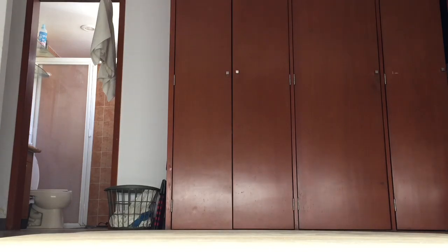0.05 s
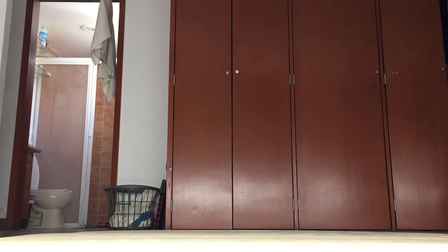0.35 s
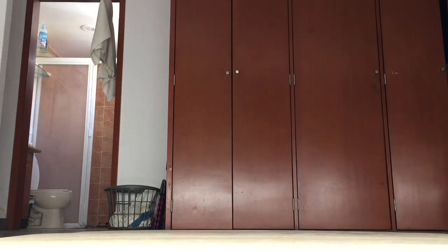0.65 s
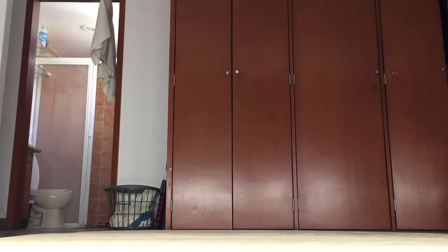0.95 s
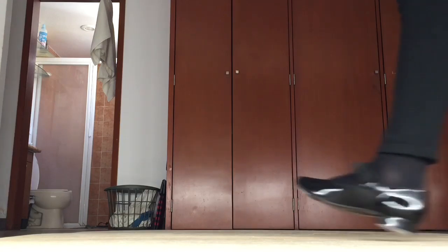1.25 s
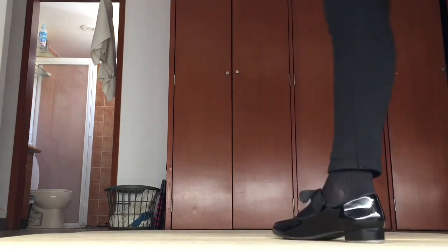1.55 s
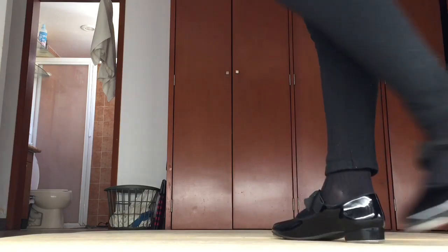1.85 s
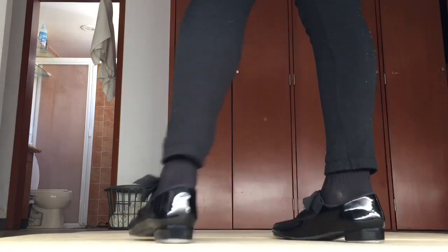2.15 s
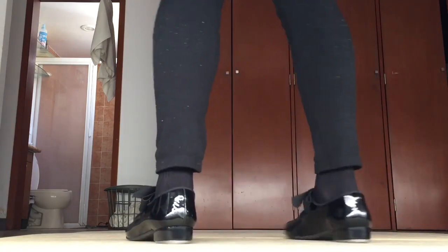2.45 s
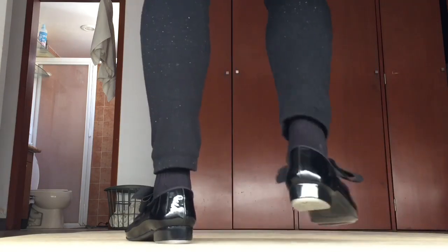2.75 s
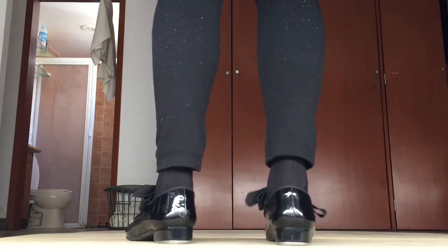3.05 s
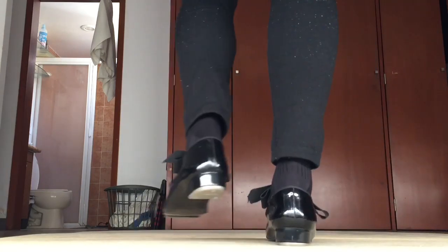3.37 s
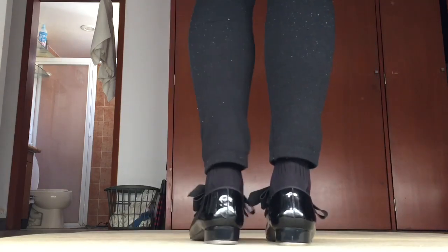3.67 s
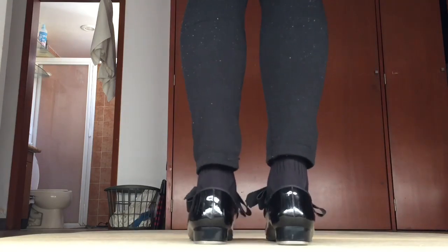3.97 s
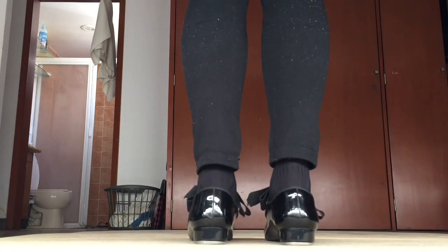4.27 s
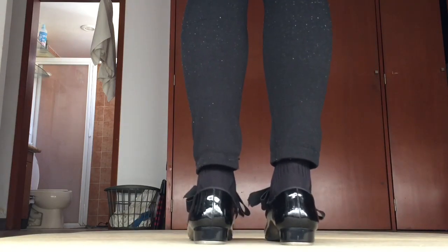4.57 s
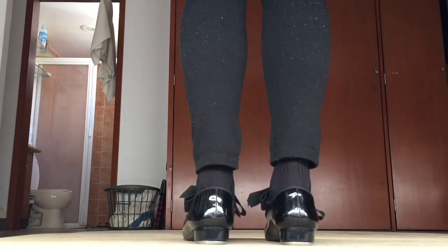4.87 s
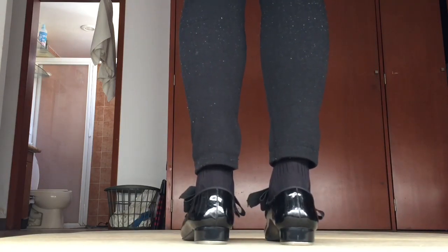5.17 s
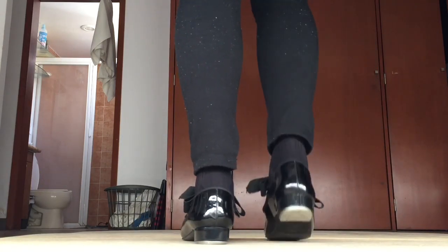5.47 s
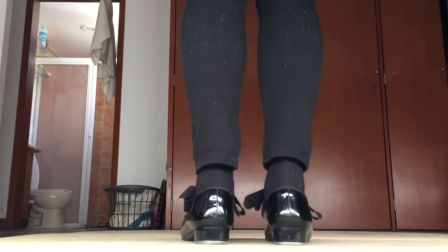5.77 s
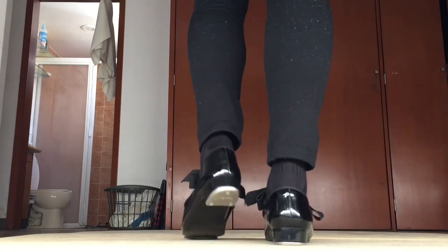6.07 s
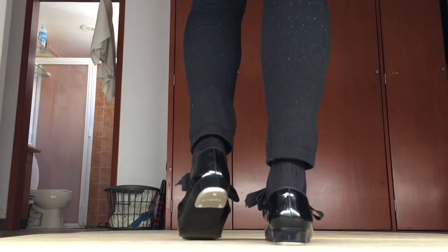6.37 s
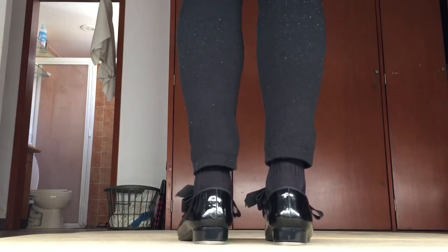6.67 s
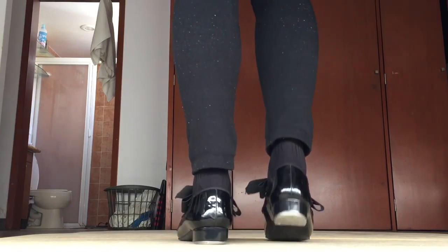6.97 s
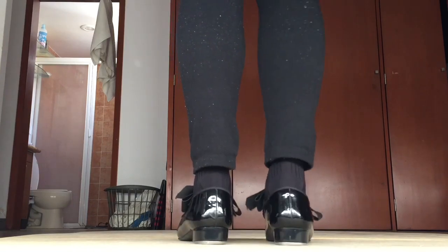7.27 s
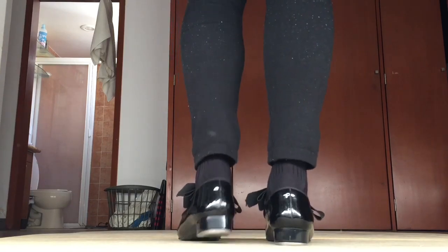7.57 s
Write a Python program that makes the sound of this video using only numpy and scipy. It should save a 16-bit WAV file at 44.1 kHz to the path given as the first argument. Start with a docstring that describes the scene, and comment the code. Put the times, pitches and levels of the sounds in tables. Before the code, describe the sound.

Close heel-and-toe steps in tap shoes, then separate hard stamps with a metallic ring, echoing in a small room over soft hiss.

```python
"""In a small bare room, tap shoes walk in, heel then toe, and stamp on a hard floor near a microphone
lying on it. Each blow thumps the floor, knocks the heel and sole and rings the metal tap: the right
shoe stamps brightly, the left one dully. The room rings on for half a second. Between steps the shoes
tick and shuffle. The air hisses softly, and for a moment a far engine drones faintly."""
import sys
import numpy as np
from scipy import signal
from scipy.fft import rfft, irfft, next_fast_len
from scipy.io import wavfile

SR = 44100
rng = np.random.default_rng(int(sys.argv[2]) if len(sys.argv) > 2 else 0)


def wav_out(sig):
    """Save sig, one row per channel (or a flat mono array), as 16-bit PCM at SR to the path in sys.argv[1]."""
    wavfile.write(sys.argv[1], SR, np.round(np.clip(np.atleast_2d(sig).T, -1, 1) * 32767).astype(np.int16))


N = 340452

# The tone of the room's hiss: pitch_hz, level_db
HISS_SPECTRUM = [(18, -39), (30, -4), (106, -3.5), (153, -14), (215, -5.5), (328, -18.5), (569, -18.5),
                 (1070, -18.5), (1190, -17.5), (1390, -24.5), (16000, -43.5)]
# A foot rolls, lifts or grazes the floor: start_s, strength_db, heel_hz, sharpness_hz
LIGHT_TOUCHES = [(0.048, -44, 577, 1000), (1.796, -61.5, 720, 9000), (2.637, -38.5, 606, 1100),
                 (4.0695, -44.5, 786, 2205), (5.4548, -55, 917, 7040), (5.803, -53.5, 957, 7000),
                 (5.8166, -37.5, 1000, 1295), (6.600, -30, 900, 1310), (7.2609, -48.5, 794, 1175)]
# The pitches at which the metal tap rings on its sole: pitch_hz, width_hz, level_db
TAP_RINGS = [(1310, 91, -4), (1776, 95, 3.5), (1884, 640, -2), (2400, 1900, -13.5), (3354, 73, -13),
             (3560, 7.6, -5.5), (4002, 1100, -11), (3930, 21, -7.5), (5490, 590, -10), (6564, 60, -7),
             (6330, 700, -8), (6940, 100, -11.5), (7525, 2400, -19.5), (9800, 1400, -24),
             (13550, 6600, -27.5)]
# The room's fading tail (decay is the time to fall by 60 dB): pitch_hz, level_db, decay_s
ROOM_TAIL = [(71, 6, .85), (166, -3.5, 0.5), (360, 3.5, .5), (623, 3.5, 0.57), (1030, 3, 0.64),
             (1930, -1.5, 0.6), (3700, 0, 0.64), (6260, -5.5, 0.43), (8400, -8.5, 1), (13700, -12.5, .17)]
# First echoes, from the wardrobe doors and walls: delay_s, level_db
FIRST_ECHOES = [(.0066, -12), (.0130, -15.5), (0.0147, -13)]
# Standing waves that stick out of the room's tail: pitch_hz, width_hz, level_db
STANDING_WAVES = [(187, 7.7, -0.5), (398, 2.3, -2), (538, 3.6, -3.5), (729, 14, 1.5), (1030, 14, 0.5),
                  (1470, 17, 0)]
# The direct sound grows as the feet come up to the microphone: time_s, level_db
APPROACH = [(0.6, -1.5), (2.3, -1), (3.0, -1), (5.8, 1.5)]
# Steps and stamps (more lean means more sole and less heel):
# start_s, landing_name, strength_db, heel_hz, lean_db, sharpness_hz
FOOTSTEPS = [(0.633, "heel", -17.5, 440, 2.5, 3900), (0.8150, "sole", -15.5, 537, -0.1, 4500),
             (1.465, "heel", -20.5, 583, -6, 2536), (1.587, "sole", -19, 627, -1.5, 5370),
             (2.2950, "sole", -24.5, 690, 3, 3100), (2.3110, "sole", -15.5, 661, -2, 5300),
             (3.034, "right stamp", -14, 589, -2, 8200), (3.6866, "sole", -18, 748, 4, 5600),
             (3.6933, "left stamp", -15, 702, -1.5, 5520), (5.8630, "right stamp", -12.5, 706, 1, 12400),
             (6.6320, "left stamp", -12, 776, -0.5, 4000), (7.3202, "right stamp", -12, 666, 0.5, 13700)]
# Ways of landing, by name:
# thump_hz, thump_width_hz, thump_db, sole_hz, sole_width_hz, tap_db, damping_hz
WAYS_OF_LANDING = {"heel": (177, 320.5, -1, 1381.5, 663, -6, 499),
                   "sole": (160, 339, -4, 998.5, 900, -7, 449.5),
                   "left stamp": (181, 112.5, -1, 1067, 880, -14, 400),
                   "right stamp": (179, 300.5, -6, 940, 740, -3, 1)}
# Sliding soles: middle_s, length_s, level_db, pitch_hz
SOLE_SLIDES = [(2.581, 0.07, -68.5, 5610), (4.138, .10, -75.5, 4500)]
# A far engine speeds up, then drops back as if changing gear: time_s, firing_rate_hz, level_db
ENGINE_RUN = [(3.2, 53.8, -71), (3.42, 56.9, -50.5), (3.75, 61.4, -55.5), (4.3, 68.2, -58),
              (4.5, 70.1, -55), (4.66, 56.6, -55.5), (5.1, 51.56, -52), (5.35, 50, -67)]
# Low pitches at which the room booms: pitch_hz, width_hz, level_db
ROOM_BOOMS = [(68.5, 14, 1.5), (104, 7, -2), (112.8, 8, -1.5), (135, 6, -3.5)]

HEEL_WIDTH_HZ, BLOW_GAIN_DB = 280, 40.5  # shared by touches and steps


def from_db(db):
    """Turn decibels into a number to multiply by."""
    return 10 ** (np.asarray(db) / 20)


def unit_energy(x):
    """Scale so that the squares add up to one."""
    return x / np.sqrt(np.sum(x ** 2) + 1e-20)


def at_hz(table, hz, column=1):
    """Read a table's column at any pitch, sliding smoothly between rows."""
    table = np.array(table)
    return np.interp(np.log(hz + 1e-9), np.log(table[:, 0]), table[:, column])


def keep_band(x, hz, kind, order=2):
    """Keep the "low" part of a sound, the "high" part or a "band" between two pitches."""
    edge = np.clip(hz, 10, .47 * SR)
    return signal.sosfilt(signal.butter(order, edge, kind, fs=SR, output="sos"), x + 1e-18)


def add(track, start_s, sound):
    """Mix a sound into the track from start_s on."""
    start = int(np.clip(round(start_s * SR), 0, N - 1))
    track[start:start + len(sound)] += sound[:N - start]


def resonance(hz, centre_hz, width_hz, level_db):
    """The power of a ringing thing at each pitch: high at its centre, falling steeply to the sides."""
    detuning = (hz ** 2 - centre_hz ** 2) / (hz * width_hz + 1e-9)
    return (from_db(level_db) / (1 + detuning ** 2)) ** 2


def struck(power):
    """Turn power at each pitch into a ring that comes as early as it can (minimum phase)."""
    cepstrum = irfft(np.log(power + 1e-12) / 2)
    half = len(cepstrum) // 2
    # fold the half before the hit onto the half after it
    cepstrum[1:half] *= 2
    cepstrum[half + 1:] = 0
    return irfft(np.exp(rfft(cepstrum)))[:half]


def air_hiss(above_400_hz_db=-67):
    """The steady murmur of air in the room."""
    hz = np.fft.rfftfreq(N, 1 / SR)
    air = irfft(rfft(rng.standard_normal(N)) * from_db(at_hz(HISS_SPECTRUM, hz)), N)
    return from_db(above_400_hz_db) * air / np.std(keep_band(air, 400, "high"))


def touch(strength_db, heel_hz, sharpness_hz):
    """A light contact: floor, heel, sole and tap ring, always in the same balance."""
    thump = (150, 340, strength_db - 3)  # pitch_hz, width_hz, level_db
    heel = (heel_hz, HEEL_WIDTH_HZ, strength_db)
    sole = (1010, 846, strength_db - 5)
    return blow([thump, heel, sole], strength_db - 0.5, sharpness_hz, damping_hz=60)


def blow(knocks, tap_db, sharpness_hz, damping_hz, steepness=7.4):
    """One hit rings floor, shoe and metal tap; a tap pressed to the floor rings shorter and weaker."""
    hz = np.fft.rfftfreq(8192, 1 / SR)
    power = sum(resonance(hz, *knock) for knock in knocks)
    for pitch_hz, width_hz, level_db in TAP_RINGS:
        damped_hz = width_hz + damping_hz
        power += resonance(hz, pitch_hz, damped_hz, level_db + tap_db) * (width_hz / damped_hz) ** 2
    # a flat, soft landing spreads the push and loses the treble; an edge keeps it
    return from_db(BLOW_GAIN_DB) * struck(power / (1 + (hz / sharpness_hz) ** steepness))


def bending_waves(sound, lag_hz=(600, 1500), spread_hz=1100):
    """Bending waves bring the treble first and the lower pitches a moment later."""
    radius = np.exp(-np.pi * spread_hz / SR)
    for hz in lag_hz:
        # an allpass filter: it delays the pitches near hz and keeps their level
        feedback = [1, -2 * radius * np.cos(2 * np.pi * hz / SR), radius ** 2]
        sound = signal.lfilter(feedback[::-1], feedback, sound + 1e-18)
    return sound


def land(sound, time_s, grit=0.22, grit_s=0.0016, room_db=-0.29):
    """Close up, the tap chatters briefly as it settles; the room's answer blurs that detail."""
    t = np.arange(SR // 100) / SR
    chatter = grit * rng.standard_normal(len(t)) * np.exp(-t / grit_s)
    chatter[0] = 1  # the hit itself
    direct = signal.fftconvolve(bending_waves(sound), unit_energy(chatter))
    direct_db = np.interp(time_s, *np.transpose(APPROACH))
    out = from_db(room_db) * standing_waves(room(sound))
    add(out, 0, from_db(direct_db) * direct)
    return out


def room(sound, build_s=0.00057, early_db=-4.0, early_s=0.031, echo_cutoff_hz=6000):
    """First echoes and a smooth tail; the pattern is new for each place a foot lands."""
    t = np.arange(SR * 3 // 5) / SR
    noise = rng.standard_normal((2, len(t)))
    edges_hz = np.geomspace(40, 18000, 17)
    # reflections take a moment to arrive and are strongest at first
    onset = (1 - np.exp(-(t / build_s) ** 2)) * (1 + from_db(early_db) * np.exp(-t / early_s))
    tail = np.zeros(len(t))
    for k, (low, high) in enumerate(zip(edges_hz, edges_hz[1:])):
        hz = np.sqrt(low * high)
        fade = np.exp(-np.log(1000) * t / at_hz(ROOM_TAIL, hz, column=2))
        band = keep_band(noise[k % 2], [low, high], "band")
        tail += from_db(at_hz(ROOM_TAIL, hz)) * unit_energy(onset * fade) * band
    echoes = np.zeros(len(t))
    for delay_s, level_db in FIRST_ECHOES:
        stretch = 1 + .06 * rng.uniform(-1, 1)
        echoes[int(delay_s * SR * stretch)] += from_db(level_db)
    return signal.fftconvolve(sound, tail + keep_band(echoes, echo_cutoff_hz, "low", order=1))


def standing_waves(tail):
    """The room favours the same few pitches wherever the foot lands."""
    size = next_fast_len(len(tail) + SR // 4)
    hz = np.fft.rfftfreq(size, 1 / SR)
    peaks = sum(from_db(level_db) / 2 / (1 + 2j * (hz - pitch_hz) / width_hz)
                for pitch_hz, width_hz, level_db in STANDING_WAVES)
    return irfft(rfft(tail, size) * (1 + peaks), size)


def step(landing, strength_db, heel_hz, lean_db, sharpness_hz, usual_step_db=-13):
    """The way of landing sets the tone; strength raises every part, the thump most of all."""
    thump_hz, thump_width_hz, thump_db, sole_hz, sole_width_hz, tap_db, damping_hz = (
        WAYS_OF_LANDING[landing])
    # a harder step puts more of the body's weight into the thump
    weight_db = 0.03 * (strength_db - usual_step_db)
    thump = (thump_hz, thump_width_hz, strength_db + thump_db + weight_db)
    heel = (heel_hz, HEEL_WIDTH_HZ, strength_db - lean_db)
    sole = (sole_hz, sole_width_hz, strength_db + lean_db)
    return blow([thump, heel, sole], strength_db + tap_db, sharpness_hz, damping_hz)


def shuffle(length_s, level_db, pitch_hz):
    """A sliding sole: grainy noise, one octave wide, that swells and fades."""
    size = int(length_s * SR)
    grains = rng.laplace(size=SR)[:size] * np.hanning(size)
    scrape = keep_band(grains, [pitch_hz / np.sqrt(2), pitch_hz * np.sqrt(2)], "band")
    return from_db(level_db) * scrape / np.std(scrape)


def far_engine(waver=0.036, waver_hz=14, fade_s=.15):
    """The engine's firing tone and its octave swell as they pass a pitch at which the room booms."""
    t = np.arange(N) / SR
    time_s, rate_hz, level_db = np.transpose(ENGINE_RUN)
    hz = np.interp(t, time_s, rate_hz)
    wander = keep_band(rng.standard_normal(N), waver_hz, "low")
    phase = 2 * np.pi * np.cumsum(hz * (1 + waver * wander / np.std(wander))) / SR
    tone = np.zeros(N)
    for harmonic in (1, 2):
        boom_power = sum(resonance(harmonic * hz, *boom) for boom in ROOM_BOOMS)
        tone += np.sqrt(2 * boom_power) * np.sin(harmonic * phase)
    outside_run_s = np.abs(t - np.clip(t, time_s[0], time_s[-1]))
    return from_db(np.interp(t, time_s, level_db)) * np.exp(-outside_run_s / fade_s) * tone


def scene():
    """The dancer's shoes, the air and the far engine, in one channel."""
    shoes = np.zeros(N)
    for start_s, *settings in FOOTSTEPS:
        add(shoes, start_s, land(step(*settings), start_s))
    for start_s, *settings in LIGHT_TOUCHES:
        add(shoes, start_s, land(touch(*settings), start_s))
    for middle_s, length_s, *settings in SOLE_SLIDES:
        add(shoes, middle_s - length_s / 2, land(shuffle(length_s, *settings), middle_s))
    return (shoes + air_hiss() + far_engine())[None, :]


def record(dry, bass_hz=42, top_hz=15900):
    """The hardest stamps overload the microphone; the deepest bass and highest treble are cut."""
    rounded = dry / (1 + dry ** 6) ** (1 / 6)
    treble_cut = signal.ellip(10, .1, 70, top_hz, fs=SR, output="sos")
    return signal.sosfilt(treble_cut, keep_band(rounded, bass_hz, "high", order=3))


dry = scene()
out = record(dry)
wav_out(out)
```